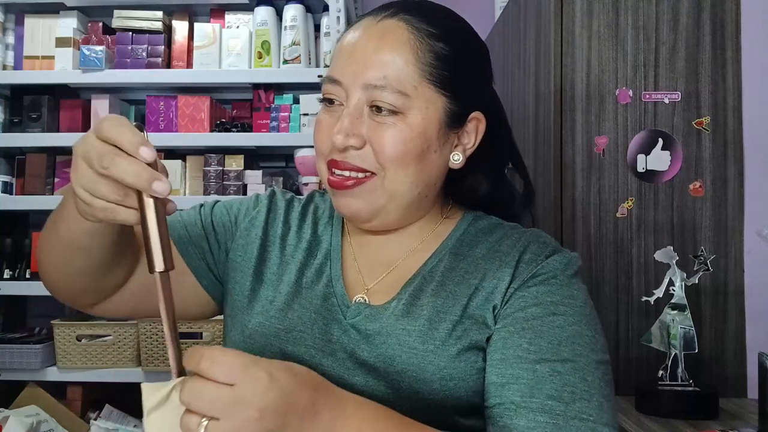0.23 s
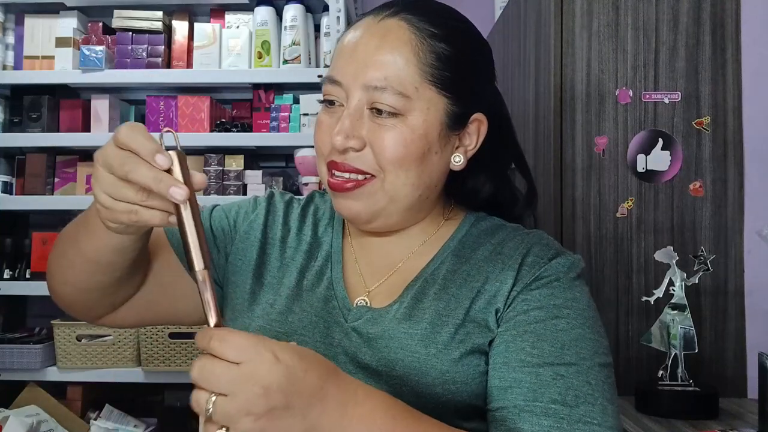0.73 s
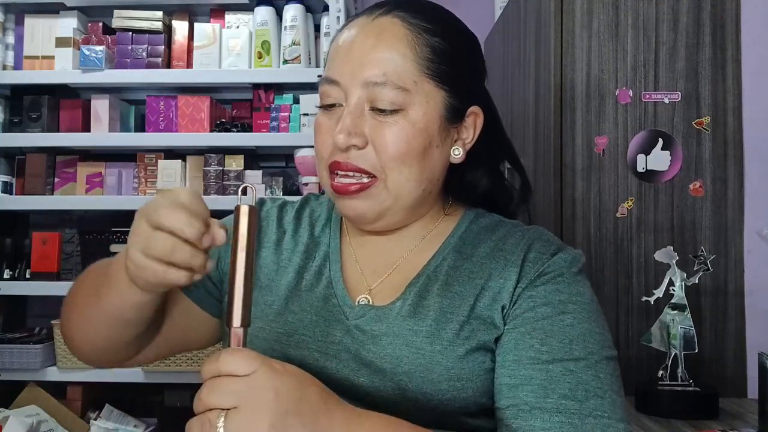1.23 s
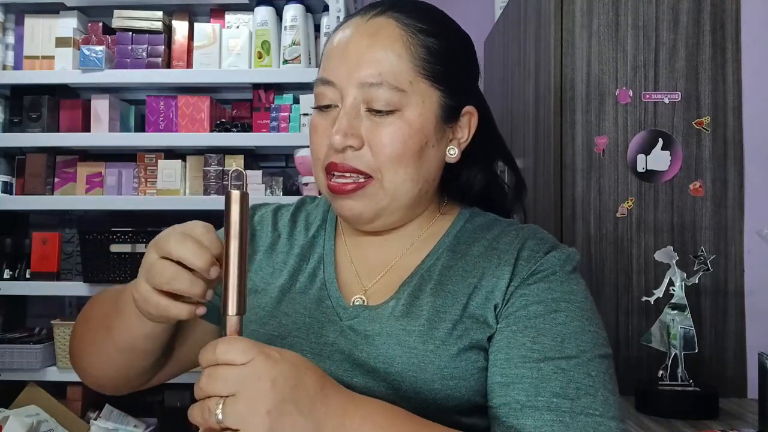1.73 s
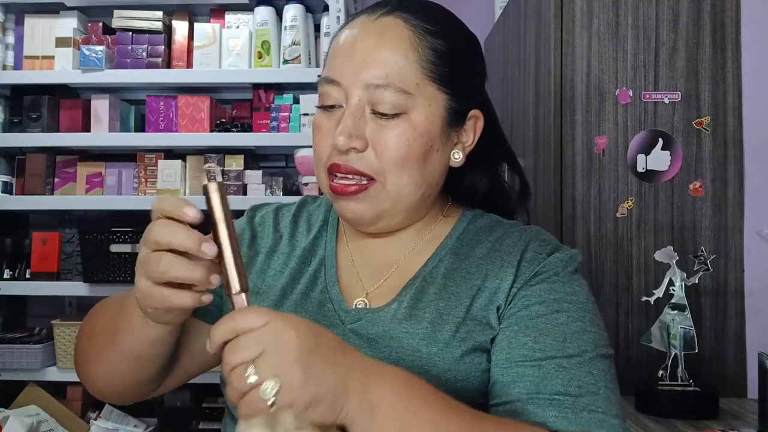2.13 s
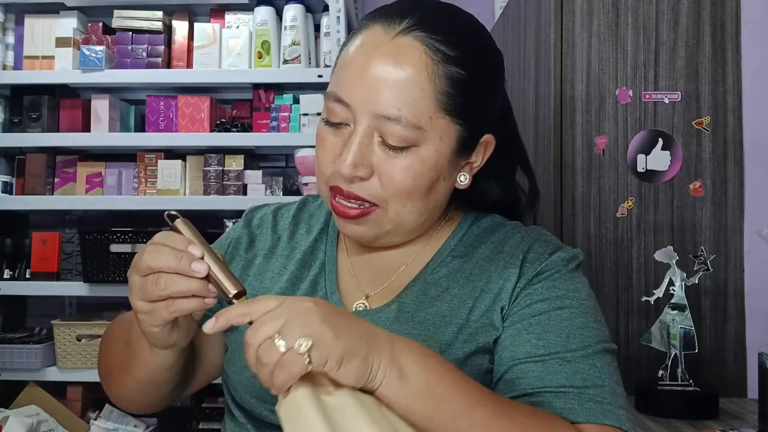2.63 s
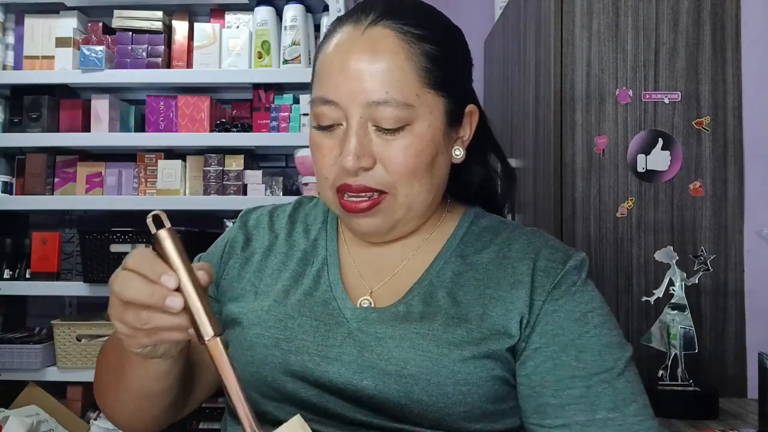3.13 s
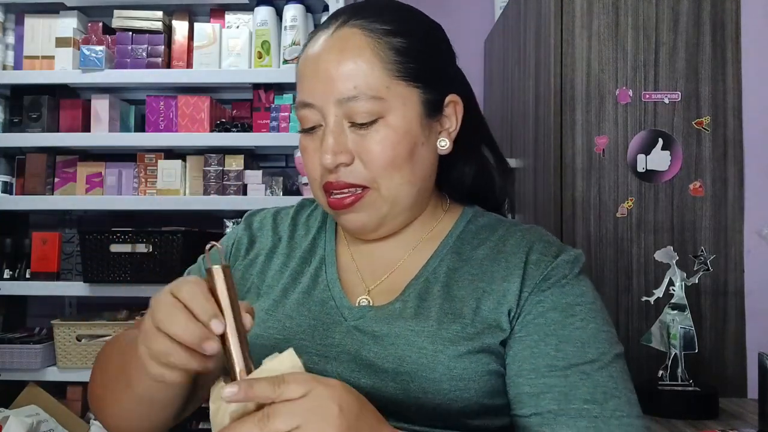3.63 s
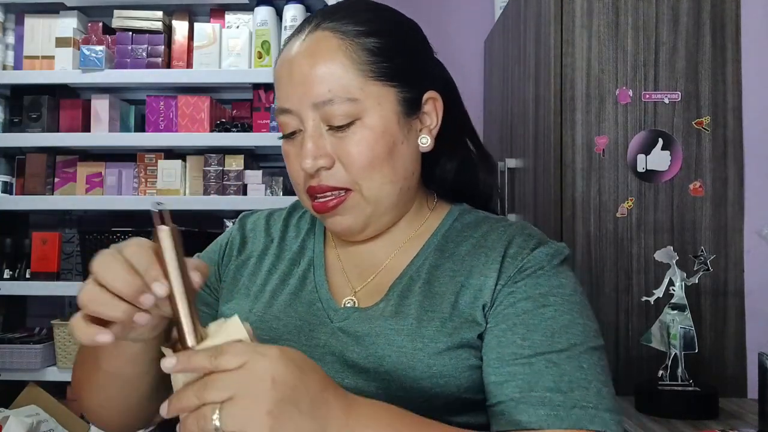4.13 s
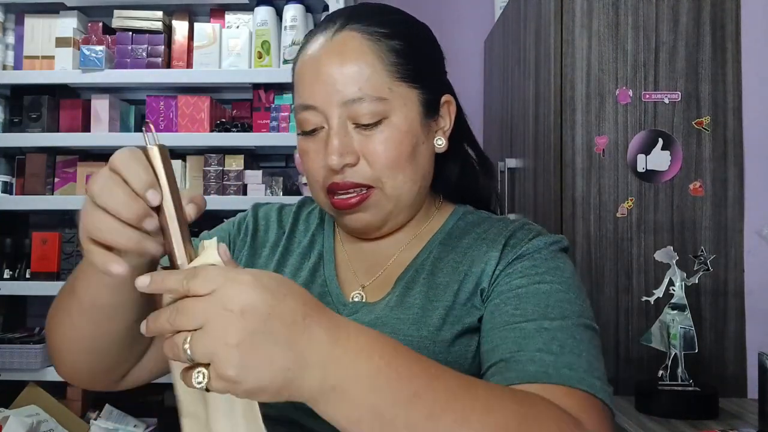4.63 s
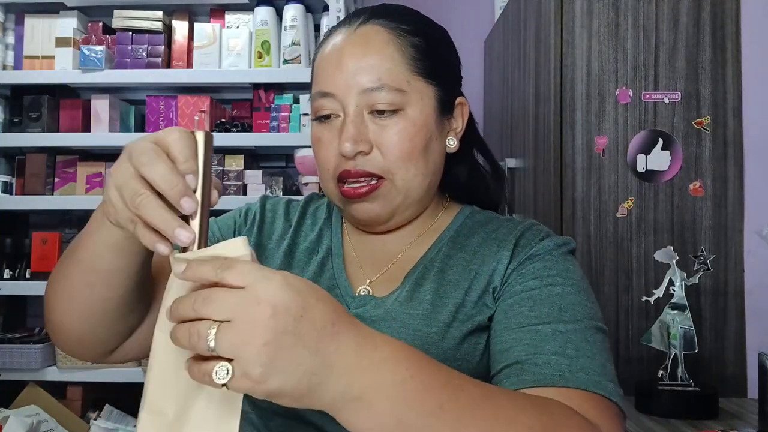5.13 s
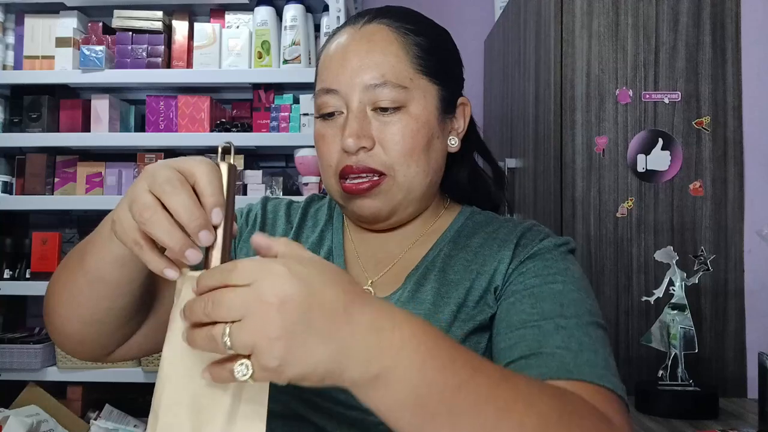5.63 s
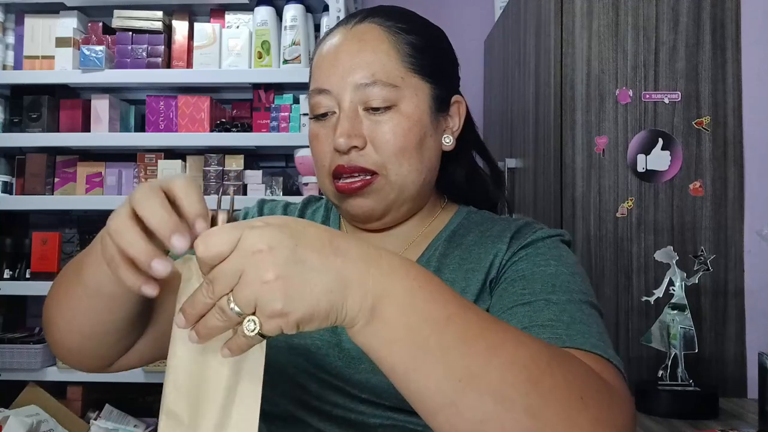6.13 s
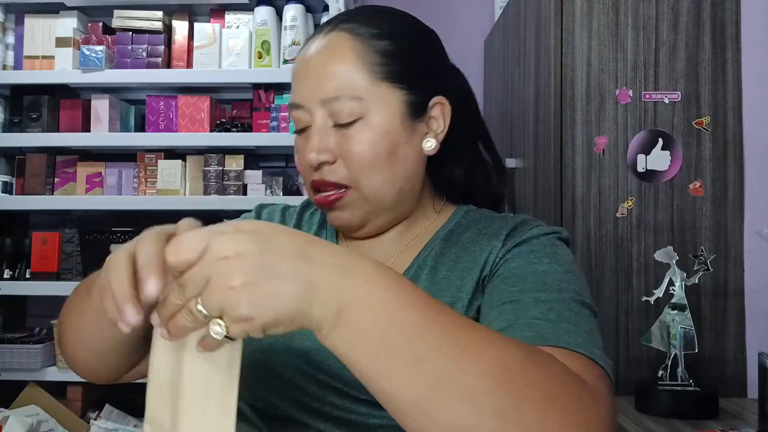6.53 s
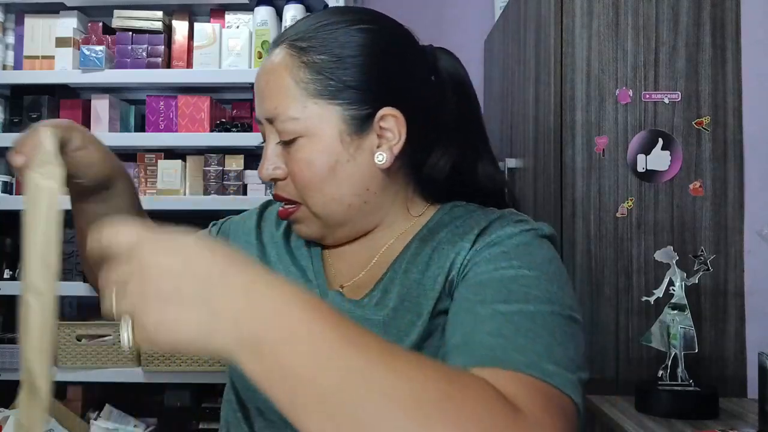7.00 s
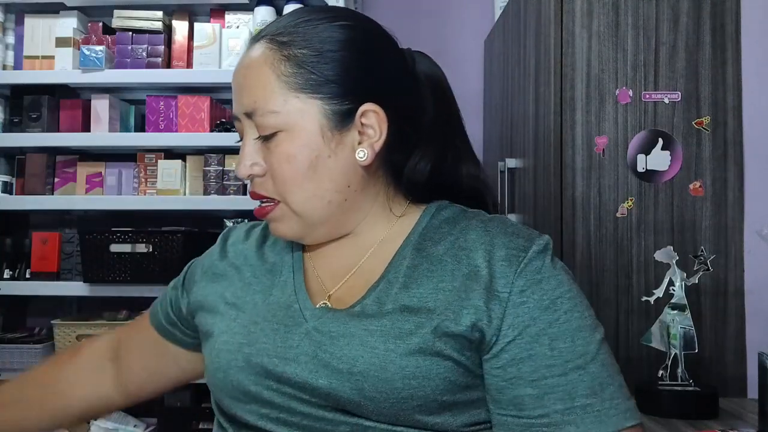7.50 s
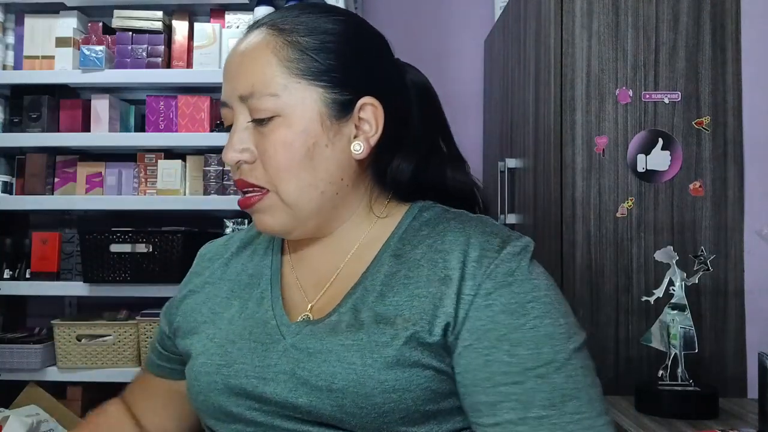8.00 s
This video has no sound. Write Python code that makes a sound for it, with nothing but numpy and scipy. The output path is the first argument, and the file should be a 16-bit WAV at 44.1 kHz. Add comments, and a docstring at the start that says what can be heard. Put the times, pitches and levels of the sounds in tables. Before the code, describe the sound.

In a small furnished room, close stereo microphones catch a stiff paper sleeve around a metal spatula. A brisk scrape opens, then sparse faint rustles and a small muffled blade knock. From three seconds crackling and snapping thicken, with one loud crunch just after six. More creasing follows, then the parcel is put aside with soft low thuds over a brief deep hum.

```python
"""At a table in a small furnished room, a long metal spatula is worked into a stiff paper sleeve.
Strokes drive noisy grains for the rub; bursts through a paper spectrum make snaps, crackles and crunches.
Damped modes make the blade knock, and the handle shoots home with one loud crunch.
Then the parcel is put aside with soft sine-and-scuff bumps, while a low drone of sine partials
swells and fades over faint filtered-noise room tone."""
import sys
import numpy as np
from scipy import signal
from scipy.fft import rfft, irfft
from scipy.io import wavfile

SR = 44100
rng = np.random.default_rng(int(sys.argv[2]) if len(sys.argv) > 2 else 0)


def transcribe(u):
    """Save the signal u as a 16-bit wav file named by the first command-line argument.

    u: samples, shape (n,) or (channels, n), limited to [-1, 1]; the rate is SR.
    q: integer samples, one column per channel.
    """
    v = np.clip(np.atleast_2d(u).T, -1, 1)
    q = np.round(v * 32767).astype(np.int16)
    wavfile.write(sys.argv[1], SR, q)


N = 364266
TIME = np.arange(N) / SR

# Levels in the tables are relative; each layer's own level argument scales them.
# common spectrum of creasing paper: hz, level_db (per Hz)
CREASE_SPECTRUM = [(80, -31), (250, -14), (500, -8), (950, -6.5), (1450, -2), (2700, -1.5), (4500, -2),
                   (7500, -8), (9000, -13), (12500, -16), (16000, -27.5)]
# the hands travel across the table: time_s, right_mic_lead_ms
HAND_PATH = [(0, 0.12), (1, 0.072), (2.6, 0.022), (3.7, 0.022), (4.2, 0.078), (6.2, 0.074), (7.2, 0.18),
             (7.7, 0.15)]


def from_db(db):
    """Decibels to gain."""
    return 10 ** (np.asarray(db) / 20)


def rms_one(x):
    """Scale to unit rms."""
    return x / np.sqrt(np.mean(x ** 2) + 1e-20)


def in_time(rows):
    """Each column of a breakpoint curve at every sample."""
    time_s, *columns = np.transpose(rows)
    return [np.interp(TIME, time_s, column) for column in columns]


def add(track, start_s, sound):
    """Mix a stereo sound in at a time."""
    start = int(start_s * SR)
    track[:, start:start + sound.shape[1]] += sound[:, :N - start]


def cut(x, hz, kind, order=2):
    """Butterworth low- or high-pass."""
    sections = signal.butter(order, min(hz, .45 * SR), kind, fs=SR, output="sos")
    return signal.sosfilt(sections, x + 1e-18)


def ring_at(x, hz, q):
    """Pass sound through one resonance."""
    return signal.lfilter(*signal.iirpeak(hz, q, fs=SR), x)


def response(spectrum, size=2048):
    """Causal (minimum-phase) impulse response of a spectrum."""
    hz, db = np.transpose(spectrum)
    grid_hz = np.maximum(np.fft.rfftfreq(size, 1 / SR), 1)
    gain = from_db(np.interp(np.log(grid_hz), np.log(hz), db))
    cepstrum = irfft(np.log(gain))
    # folding the cepstrum forward makes the response causal
    cepstrum[1:size // 2] *= 2
    cepstrum[size // 2 + 1:] = 0
    return irfft(np.exp(rfft(cepstrum)))


def through(x, impulse):
    """Pass both channels through an impulse response."""
    return signal.fftconvolve(x, [impulse], axes=1)[:, :x.shape[1]]


def brighten(spectrum, bright_db, from_hz=2000, to_hz=10000):
    """Tilt a spectrum above from_hz, by bright_db at to_hz."""
    shares = [(hz, db, max(np.log(hz / from_hz), 0) / np.log(to_hz / from_hz)) for hz, db in spectrum]
    return [(hz, db + bright_db * share) for hz, db, share in shares]


def drift(per_s):
    """Random wander in straight lines between per_s normal values a second."""
    knots = rng.standard_normal(N // 100)
    return np.interp(TIME * per_s, np.arange(len(knots)), knots)


def random_flips(per_s, spread_db):
    """Sparse impulses of random moment, size and sign."""
    sizes = from_db(spread_db * np.minimum(rng.exponential(1, N), 4))
    return sizes * rng.choice([-1, 1], N) * (rng.random(N) < per_s / SR)


def grains(per_s, spread_db, smooth_db):
    """Random clicks, as of fibres that catch and let go, over a smooth hiss; rms 1."""
    clicks = rms_one(random_flips(per_s, spread_db))
    return rms_one(clicks + from_db(smooth_db) * rng.standard_normal(N))


def diffuse(apart_hz, size):
    """Noise at two close microphones: mostly alike in the bass, unrelated in the treble."""
    mid, side = rng.standard_normal((2, size))
    side = cut(side, apart_hz, "high", order=1) + from_db(-15) * side
    return np.array([mid + side, mid - side])


def room(x, start_s=0, wet_db=0):
    """Direct sound plus diffuse echoes that follow its fading energy.
    The paper keeps moving, so the echoes form no fixed pattern."""
    # echoes off sleeve and table, then off the walls: level_db, t60_s
    near_echo = (0, 0.028)
    wall_echo = (-2.2, 0.1)
    t = np.arange(len(x)) / SR
    lead_s = np.interp(start_s + t, *np.transpose(HAND_PATH)) / 1000
    energy = 0
    for (db, t60_s), gap_s in ((near_echo, 0), (wall_echo, 0.011)):
        arriving = np.pad(x ** 2, (int(gap_s * SR), 0))[:len(x)]
        keep = from_db(-60 / (t60_s * SR)) ** 2  # energy kept per sample
        energy = energy + from_db(db) ** 2 * signal.lfilter([0, 1 - keep], [1, -keep], arriving + 1e-24)
    direct = np.array([np.interp(t - lead_s, t, x), x])
    echoes = np.sqrt(energy) * rms_one(diffuse(1500, len(x)))
    return direct + from_db(wet_db) * echoes


def strokes(size=2000):
    """Each stroke grips, swells or eases evenly in dB, and lets go; the loudest dominates the colour.
    Returns gain, brightness dB and flutter dB."""
    # pushes and pulls that slide the paper: start_s, length_s, level_db, swell_db (start to end),
    # brightness_db, flutter_db (of the whole sheet)
    stroke_table = [(0, 0.017, -33, -21, 4, -24), (0.04, 0.14, -41.5, -10.5, 6.5, -7),
                    (0.194, 0.21, -58.5, -9, 4, -4.5), (0.449, 0.13, -57, -7.5, 3, -12),
                    (0.505, 0.26, -70, 18, -1, -3.5), (0.768, 0.045, -53.5, 18, 3.5, -18),
                    (0.882, 0.13, -57, 1, 10, -16), (1.045, 0.071, -50.5, 11.5, 3, -6.5),
                    (1.602, 0.14, -55.5, -18, 7, -2.5), (1.875, 0.2, -63, -7, 15, -5.5),
                    (2.073, 0.038, -60.5, 28, 1, -3), (2.143, 0.1, -48, -14, 2, -6),
                    (2.281, 0.15, -64.5, -1, -2, -8), (2.659, 0.097, -57, 22, 9.5, -14.5),
                    (2.758, 0.17, -50.5, 4, 9, -9), (2.848, 0.15, -42.5, -2, 11.5, -11.5),
                    (3.066, 0.17, -48.5, 3.5, 2.5, -3.5), (3.267, 0.37, -56.5, 3, 9, -5),
                    (3.487, 0.18, -38, 17, 3.5, -4.5), (3.795, 0.12, -50.5, 16.5, 0, -4),
                    (4.023, 0.083, -42, -4, 5.5, 0.5), (4.168, 0.11, -46, -3.5, 5, -1),
                    (4.293, 0.29, -46.5, 12.5, 4.5, -4), (4.676, 0.19, -43.5, -4, -1.5, -1),
                    (4.906, 0.062, -52, 20, 10, -6.5), (4.959, 0.088, -48.5, 9, 0, 3.5),
                    (5.101, 0.048, -49.5, 0, -2, 1.5), (5.19, 0.16, -55, -6, 2, -9),
                    (5.293, 0.086, -44.5, -1.5, 7, -2.5), (5.407, 0.23, -46.5, -0.5, 2, -3),
                    (5.676, 0.14, -55, -4, 13.5, -15), (5.794, 0.079, -48, 4.5, 5.5, -2.5),
                    (5.916, 0.1, -42.5, 17, 4.5, -6.5), (6.011, 0.11, -43, -5, -3, 4),
                    (6.091, 0.25, -39, 22.5, 6, -7), (6.324, 0.081, -42.5, -4, -8, 13),
                    (6.468, 0.088, -60, -19, -1.5, -0.5), (6.597, 0.14, -54, 18, 5.5, -13.5),
                    (6.704, 0.093, -42, 17.5, 2, -13), (6.838, 0.097, -41, 5, 0, -5),
                    (7.018, 0.18, -62.5, -19.5, 3, -1), (7.209, 0.032, -52, 3.5, 12.5, -27),
                    (7.283, 0.38, -65.5, 0, 8, -13), (7.375, 0.027, -53.5, 7.5, 1, -5),
                    (7.584, 0.11, -44, 13.5, 11, -16), (7.697, 0.071, -36, 9, 0, -3),
                    (7.788, 0.18, -40, 2.5, 3, -2.5)]
    attack_s, release_t60_s = 0.013, 0.21
    t = np.linspace(0, N / SR, size)
    start, length, db, swell_db, bright_db, flutter_db = np.transpose(stroke_table)[:, :, None]
    attack = np.clip((t - start) / attack_s, 0, 1)
    progress = np.clip((t - start) / length, 0, 1)
    release_db = -60 * np.maximum(t - start - length, 0) / release_t60_s
    power = (attack * from_db(db + swell_db * (progress - .5) + release_db)) ** 2
    total = power.sum(0) + 1e-12
    share = power / total
    curves = [t, np.sqrt(total), (share * bright_db).sum(0), (share * flutter_db).sum(0)]
    return in_time(np.transpose(curves))


def crinkles(per_s, low_hz, high_hz, q, fall_db, count=28):
    """Tiny facets flip at random, each ringing briefly at the pitch of its size; rms 1."""
    out, dealt = 0, rng.integers(0, count, N)
    flips = random_flips(per_s, spread_db=2)
    middle_hz = np.sqrt(low_hz * high_hz)
    for k, hz in enumerate(np.geomspace(low_hz, high_hz, count)):
        ring = ring_at(flips * (dealt == k) + 1e-18, hz, q)
        octaves_off = abs(np.log2(hz / middle_hz))
        out = out + from_db(fall_db * octaves_off) * ring / np.sqrt(hz)
    lead_ms, = in_time(HAND_PATH)
    return rms_one(np.array([np.interp(TIME - lead_ms / 1000, TIME, out), out]))


def rubbing(rub_db, flutter_db, jerk_db, tick_db):
    """Sliding paper: jerky grains, stray ticks and crinkles over the low flutter of the sheet."""
    # paper sliding: hz, level_db (per Hz)
    friction_spectrum = [(400, -20), (800, -10), (1050, -9), (1450, 1.5), (2000, 0), (2700, 1.5),
                         (4500, -4), (7500, -11), (8800, -15.5), (12000, -16), (16000, -23.5)]
    # the whole sheet flapping: hz, level_db (per Hz)
    sheet_spectrum = [(35, -25), (70, -9), (140, -5), (270, 1), (360, -6), (470, 4), (620, -4), (900, -8.5),
                      (1600, -18.5), (5000, -61.5)]
    effort, bright_db, sheet_db = strokes()
    stroke = effort * from_db(jerk_db * drift(110))
    fibres = grains(per_s=1300, spread_db=2.5, smooth_db=-4.5)
    ticks = grains(per_s=38, spread_db=5.5, smooth_db=-42.5)
    excitation = room(stroke * (fibres + from_db(tick_db) * ticks))
    # pressed paper sounds dull, a light quick slide hisses: the colour glides between these
    friction, tilts_db = 0, np.linspace(-20, 20, 5)
    for tilt_db, pick in zip(tilts_db, np.eye(len(tilts_db))):
        colour = response(brighten(friction_spectrum, tilt_db))
        weight = np.interp(bright_db, tilts_db, pick)
        friction = friction + weight * through(excitation, colour / np.linalg.norm(colour))
    # the duller the stroke, the harder the paper is pressed and the more it crinkles
    pressed = 1 / (1 + from_db(bright_db))
    facets = crinkles(per_s=150, low_hz=829, high_hz=4136, q=82.0, fall_db=-5.0)
    friction = friction + from_db(-2.0) * pressed * stroke * facets
    flaps = stroke * from_db(sheet_db) * grains(per_s=110, spread_db=2.5, smooth_db=-6.5)
    sheet = response(sheet_spectrum)
    flutter = through(room(flaps), sheet / np.linalg.norm(sheet))
    return from_db(rub_db) * friction + from_db(flutter_db) * flutter


def fold(count=90):
    """Every fold has a shape of its own, with random peaks and dips on the common spectrum."""
    hz, db = np.transpose(CREASE_SPECTRUM)
    fine_hz = np.geomspace(hz[0], hz[-1], count)
    ripple_db = 3.6 * rng.standard_normal(count)
    return zip(fine_hz, np.interp(np.log(fine_hz), np.log(hz), db) + ripple_db)


def snaps(burst_s, growth, typical_db, patch_db, trim_db, size=9000):
    """A crease gives way in a brief burst, longer for a big one; the paper around it rings until it settles."""
    # the louder creases: start_s, level_db, patch_pitch_hz (buckling patch), brightness_db
    snap_table = [(0.029, -34.5, 1500, 3), (0.036, -33.5, 4150, 4.5), (0.053, -36, 1520, -18),
                  (0.356, -46, 3240, -11), (0.459, -44.5, 3960, 7), (0.73, -51, 2280, -8),
                  (0.816, -49.5, 2470, 4), (0.807, -55, 2000, 6), (0.964, -57.5, 1750, 2),
                  (1.103, -45, 2650, 15), (1.111, -46.5, 2660, 8), (1.606, -44, 7100, 26),
                  (1.892, -60.5, 4630, 26), (2.244, -44, 1740, -1), (2.972, -48.5, 1530, -19),
                  (3.062, -41.5, 1710, -15), (3.121, -32, 1670, -7), (3.214, -36.5, 836, -6),
                  (3.227, -36.5, 2560, 6), (3.295, -57, 3980, 19), (3.341, -56, 3000, 3),
                  (3.418, -44, 2950, -14), (3.525, -38.5, 2700, -18), (3.536, -35.5, 1750, -6),
                  (3.5763, -32, 1890, -7), (3.592, -29, 2840, 6), (3.624, -40.5, 2720, -11),
                  (3.682, -34.5, 1530, -20), (3.752, -48, 1670, -26), (3.769, -42.5, 1800, -26),
                  (3.868, -38, 2500, 2), (3.927, -35.5, 2430, -1.5), (3.975, -46.5, 2450, -11),
                  (4.016, -40.5, 2620, -3), (4.065, -36, 1390, -1), (4.079, -40, 3100, -21),
                  (4.109, -35.5, 1520, -8), (4.184, -40, 1530, -9), (4.226, -36.5, 1660, 0.5),
                  (4.256, -44.5, 2250, -9), (4.337, -49, 1800, -19), (4.359, -43.5, 2800, -4),
                  (4.387, -45.5, 1530, -9), (4.445, -43, 2280, -2), (4.524, -31.5, 2150, -1),
                  (4.545, -35.5, 4700, 3), (4.594, -42.5, 2900, -1), (4.66, -48.5, 3550, -5),
                  (4.692, -43, 1620, 1), (4.705, -32.5, 2700, -10.5), (4.794, -35, 3660, 1),
                  (4.806, -32.5, 3730, 1), (4.818, -40, 2580, -18), (4.852, -41, 5160, -3),
                  (4.974, -44.5, 2730, -7), (4.997, -41.5, 2820, 0), (5.567, -46.5, 4630, 14),
                  (5.11, -44.5, 2720, -8), (5.215, -40, 3670, -1.5), (5.238, -40.5, 2630, -4.5),
                  (5.38, -37, 2650, 1), (5.648, -41.5, 1360, -1), (5.848, -46, 2220, -30),
                  (6.011, -36.5, 2500, 4.5), (6.084, -33.5, 2100, -2.5), (6.242, -43.5, 2620, 5),
                  (6.299, -32, 2700, -2), (6.331, -19.5, 1590, -1.5), (6.448, -35, 2560, -9),
                  (6.624, -58.5, 2050, -2), (6.695, -47, 2380, -15), (6.714, -32.5, 2650, 6),
                  (6.751, -32.5, 3570, -4), (6.762, -32.5, 3680, -6), (6.79, -35, 2650, 7),
                  (6.869, -36, 3900, -15), (6.9, -33, 3740, 8), (6.919, -36.5, 4400, 1),
                  (7.027, -41, 4700, -3.5), (7.221, -51.5, 6960, 18), (7.378, -39.5, 5000, 9),
                  (7.677, -41, 6800, 5)]
    rise_s, patch_settle_s = 0.00015, 0.011
    patch_q = 8  # the patch is heavily damped
    out, t = np.zeros((2, N)), np.arange(size) / SR
    for start_s, db, hz, bright_db in snap_table:
        decay_s = burst_s * from_db(growth * (db - typical_db))
        give = rng.standard_normal(size) * np.exp(-t / decay_s) * (1 - np.exp(-t / rise_s))
        crack = through(room(give, start_s), response(brighten(fold(), bright_db)))
        patch = ring_at(crack * np.exp(-t / patch_settle_s), hz, patch_q)
        add(out, start_s, from_db(db + trim_db) * rms_one(crack + from_db(patch_db) * patch))
    return out


def crunches(edge_share, trim_db, size=12000):
    """A whole patch of paper crumples: many creases collapse in a short dense run."""
    # start_s, length_s, level_db, brightness_db
    crunch_table = [(2.89, 0.031, -42, -19), (3.645, 0.024, -30.5, -10.5), (5.028, 0.016, -36.5, -13),
                    (6.272, 0.015, -33, 4), (6.33, 0.016, -19, 0), (6.348, 0.016, -32, 7),
                    (6.377, 0.014, -25.5, -4.5), (6.818, 0.0073, -32, -3), (7.753, 0.029, -33.5, -8)]
    out, collapse = np.zeros((2, N)), grains(per_s=2500, spread_db=1.0, smooth_db=3.0)
    for start_s, length_s, db, bright_db in crunch_table:
        start, span = int(start_s * SR), int(length_s * SR)
        run = collapse[start:start + span] * signal.windows.tukey(span, edge_share)
        run = np.pad(run, (0, size - span))  # space for the echoes
        crunch = through(room(run, start_s), response(brighten(fold(), bright_db)))
        add(out, start_s, from_db(db + trim_db) * np.sqrt(span / size) * rms_one(crunch))
    return out


def crackles(per_s, trim_db, spread_db, low_hz, high_hz, q, burst_s, size=3000):
    """Small creases give way at random, each at its own pitch, as hard as the paper is being pressed."""
    out, t = np.zeros((2, N)), np.arange(size) / SR
    effort, bright_db, _ = strokes()
    pressed, paper = effort / (1 + from_db(bright_db)), response(CREASE_SPECTRUM)
    for k, (when, softness, pitch) in enumerate(rng.random((int(per_s * N / SR), 3))):
        start_s = (k + when) / per_s
        give = room(rng.standard_normal(size) * np.exp(-t / burst_s), start_s)
        hz = low_hz * (high_hz / low_hz) ** pitch
        ring = rms_one(ring_at(through(give, paper), hz, q))
        add(out, start_s, pressed[int(start_s * SR)] * from_db(trim_db - spread_db * softness) * ring)
    return out


def hiss_bands(trim_db, count=5):
    """Narrow bands of grainy hiss, each at its own gliding or nearly steady pitch, swell and fade."""
    # start_s, length_s, level_db, first_pitch_hz, last_pitch_hz, sharpness_q
    band_table = [(0.158, 0.088, -54, 1690, 1440, 4.7), (0.292, 0.056, -52, 1740, 1400, 1.8),
                  (0.547, 0.12, -63.5, 810, 940, 1.9), (1.872, 0.2, -60.5, 4300, 4000, 5.2),
                  (2.166, 0.25, -68, 2550, 2480, 4.4), (2.653, 0.19, -58.5, 2300, 2650, 4.5),
                  (2.668, 0.2, -52, 1510, 1610, 4), (3.065, 0.057, -46, 1790, 1650, 1.4),
                  (3.421, 0.17, -55, 614, 990, 1.8), (7.295, 0.15, -55.5, 5200, 4940, 0.98)]
    out, hiss = np.zeros((2, N)), room(grains(per_s=450, spread_db=5.0, smooth_db=-11.5))
    for start_s, length_s, db, first_hz, last_hz, q in band_table:
        piece, band = hiss[:, int(start_s * SR):int((start_s + length_s) * SR)], 0
        # crossfading a row of fixed resonances makes the glide
        travel = np.linspace(0, count - 1, piece.shape[1])
        for k, hz in enumerate(np.geomspace(first_hz, last_hz, count)):
            fade = np.maximum(1 - abs(travel - k), 0)
            band = band + fade * ring_at(ring_at(piece, hz, q), hz, q)
        swell = signal.windows.tukey(piece.shape[1], .5)
        add(out, start_s, from_db(db + trim_db) * rms_one(band) * swell)
    return out


def knocks(contact_s, soft_hz, trim_db, size=9000):
    """A short contact, softened by the paper, rings the blade, which is damped at once."""
    # the blade knocks inside the sleeve: start_s, level_db
    knock_table = [(0.602, -59), (1.186, -59), (2.121, -41.5), (2.148, -43.5), (2.159, -34.5),
                   (2.358, -36.5), (3.1, -40.5), (5.427, -41.5), (6.974, -43)]
    # modes of the muffled blade: hz, level_db, t60_s
    blade_modes = [(900, -0.5, 0.011), (1390, 5, 0.016), (1530, 4.5, 0.016), (1680, -11, 0.021),
                   (2650, -1, 0.031), (4200, -38, .012)]
    out, t = np.zeros((2, N)), np.arange(size) / SR
    blade = sum(from_db(mode_db - 60 * t / t60_s) * np.cos(2 * np.pi * hz * t)
                for hz, mode_db, t60_s in blade_modes)
    for start_s, db in knock_table:
        contact = rng.standard_normal(size) * t * np.exp(-t / contact_s)
        softened = cut(room(contact, start_s, wet_db=-0.5), soft_hz, "low")
        add(out, start_s, from_db(db + trim_db) * rms_one(through(softened, blade)))
    return out


def bumps(contact_s, scuff_s, scuff_db, scuff_width, trim_db, size=12000):
    """A soft push swells and dies at the pitch of the spot it hits, with a dull scuff around that pitch."""
    # hand and parcel: start_s, level_db, pitch_hz (of the spot that is hit)
    bump_table = [(1.109, -60, 66), (1.644, -63, 205), (2.162, -49, 230), (3.661, -46, 243),
                  (3.666, -42, 717), (4.107, -42, 645), (4.112, -51, 120), (4.522, -43.5, 498),
                  (4.588, -47, 259), (4.805, -51, 475), (5.111, -45.5, 460), (5.204, -50.5, 514),
                  (5.373, -57, 490), (5.423, -41, 443), (5.512, -46.5, 495), (5.629, -52, 69.6),
                  (5.868, -49.5, 453), (5.983, -43.5, 510), (6.082, -43.5, 465), (6.098, -44, 238),
                  (6.333, -30, 287), (6.337, -32.5, 104), (6.918, -45, 537), (7.723, -37.5, 244),
                  (7.754, -31, 491), (7.765, -29.5, 167), (7.774, -28, 67), (7.826, -32.5, 473),
                  (7.871, -34.5, 238), (7.913, -35, 236), (7.979, -36, 452), (7.99, -32.5, 207.6),
                  (8.011, -35.5, 127)]
    out, t = np.zeros((2, N)), np.arange(size) / SR
    for start_s, db, hz in bump_table:
        ring = np.sin(2 * np.pi * hz * t) * np.sqrt(t) * np.exp(-t / contact_s)
        contact = room(rng.standard_normal(size) * np.sqrt(t) * np.exp(-t / scuff_s), start_s)
        scuff = cut(cut(contact, hz, "high"), scuff_width * hz, "low")
        bump = rms_one(ring) + from_db(scuff_db) * rms_one(scuff)
        add(out, start_s, from_db(db + trim_db) * bump)
    return out


def drone(trim_db, rough_db, rumble_db, rumble_hz):
    """A deep tone of steady pitch whose overtones waver, rise and sink, in a soft rumble."""
    # time_s, level_db, overtones_db
    drone_curve = [(6.85, -68, -8), (6.99, -47, -14), (7.08, -42, -14.5), (7.2, -42.5, -11),
                   (7.28, -41.5, 0.5), (7.36, -44, -8), (7.55, -53.5, -4.5), (7.76, -34, -14),
                   (7.95, -38, 0.5), (8.04, -40.5, -7.5), (8.12, -45, -9), (8.26, -59.5, -4.5)]
    # multiple (of the pitch), level_db
    partials = [(1, -0.5), (2, -10.5), (3, -16.5)]
    pitch_hz = 59.85
    db, overtone_db = in_time(drone_curve)
    phase, tone = 2 * np.pi * pitch_hz * TIME, 0
    for k, part_db in partials:
        waver_db = (k > 1) * (overtone_db + rough_db * drift(27))  # overtones only
        tone = tone + from_db(part_db + waver_db) * np.sin(k * phase)
    noise = cut(rng.standard_normal((2, N)), 55.0, "high", order=6)
    rumble = from_db(rumble_db) * rms_one(cut(noise, rumble_hz, "low"))
    return from_db(db + trim_db) * (np.sqrt(2) * tone + rumble) * (TIME > drone_curve[0][0])


def room_tone(level_db):
    """Faint steady air of the room: diffuse noise through a fixed spectrum."""
    # hz, level_db (per Hz)
    air_spectrum = [(25, -14.5), (60, 4.5), (120, 0.5), (250, -2.5), (480, 2.5), (950, -6.5), (1600, -11.5),
                    (2600, -12), (5000, -26.5), (9000, -28.5), (16000, -27)]
    return from_db(level_db) * rms_one(through(diffuse(700, N), response(air_spectrum)))


def scene():
    """Paper, blade and table, over the drone and faint room tone."""
    burst_s = 0.0012  # decay of a crease giving way
    paper = rubbing(rub_db=-9.0, flutter_db=-8.5, jerk_db=4.5, tick_db=-9.5)
    paper = paper + snaps(burst_s, growth=0.071, typical_db=-48.5, patch_db=8.0, trim_db=-11.0)
    paper = paper + crunches(edge_share=0.25, trim_db=1.5)
    paper = paper + crackles(per_s=28, trim_db=-2.5, spread_db=10.0, low_hz=1230, high_hz=5000,
                             q=5.1, burst_s=burst_s)
    hiss = hiss_bands(trim_db=-3.5)
    blows = knocks(contact_s=0.00077, soft_hz=3700, trim_db=-13.0)
    blows = blows + bumps(contact_s=0.0081, scuff_s=0.019, scuff_db=-9.0, scuff_width=0.88, trim_db=-15.0)
    hum = drone(trim_db=-1.0, rough_db=6.0, rumble_db=-14.0, rumble_hz=120)
    return paper + hiss + blows + hum + room_tone(level_db=-71.5)


def record(dry):
    """The two microphones differ a little in colour; the deepest bass and the top are cut."""
    # left minus right: hz, difference_db
    balance = [(200, -0.3), (1500, -1.4), (4000, -1.5), (7800, -3.5), (8500, 0.5), (10500, 3.5),
               (12500, 0.5), (16000, -2)]
    colours = [response([(hz, sign * db / 2) for hz, db in balance]) for sign in (1, -1)]
    coloured = signal.fftconvolve(cut(dry, 41, "high", order=4), colours, axes=1)[:, :N]
    top_cut = signal.ellip(10, .1, 80, 16000, fs=SR, output="sos")
    return signal.sosfilt(top_cut, coloured)


dry = scene()
out = record(dry)
transcribe(out)
```